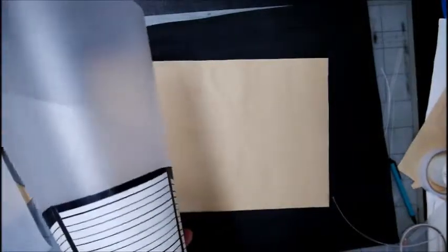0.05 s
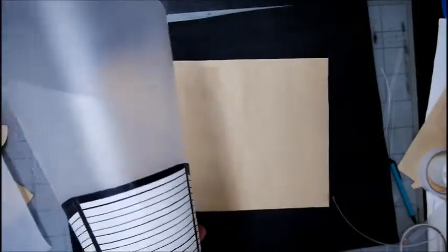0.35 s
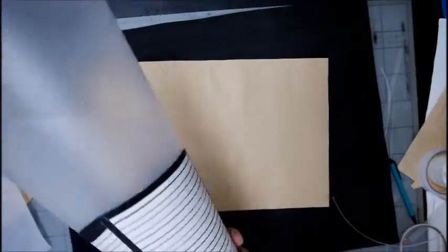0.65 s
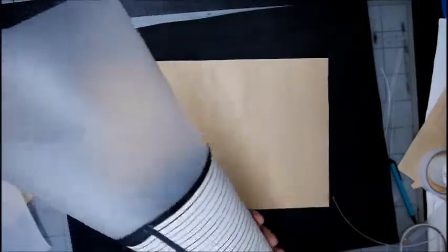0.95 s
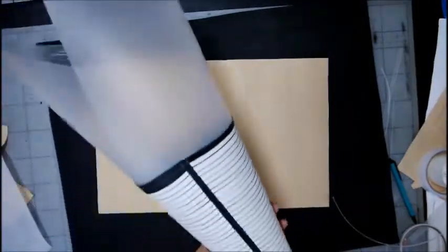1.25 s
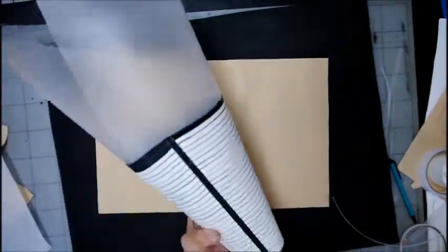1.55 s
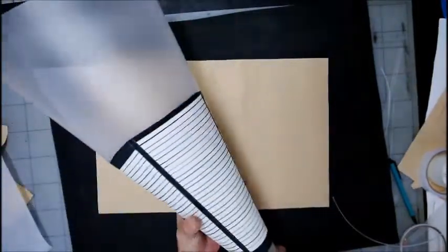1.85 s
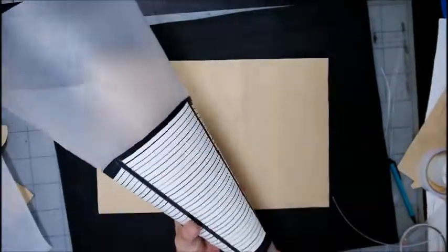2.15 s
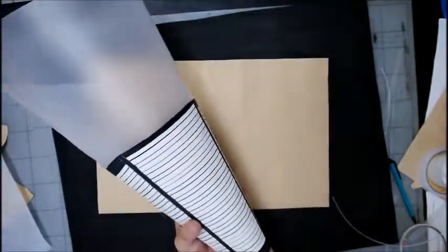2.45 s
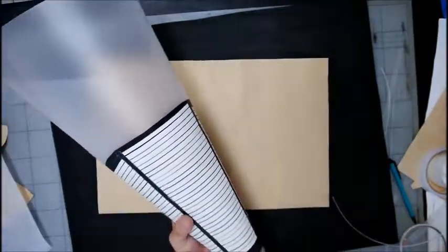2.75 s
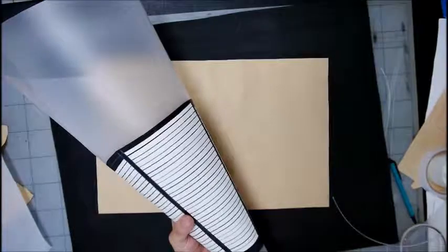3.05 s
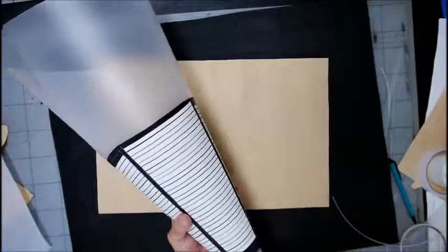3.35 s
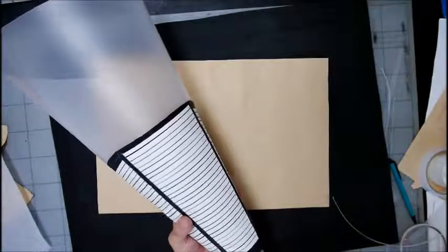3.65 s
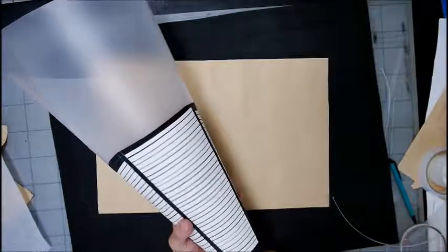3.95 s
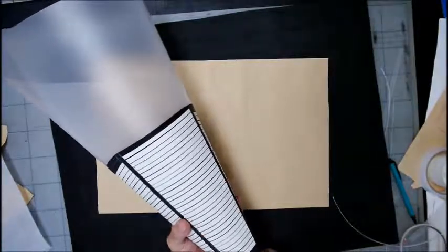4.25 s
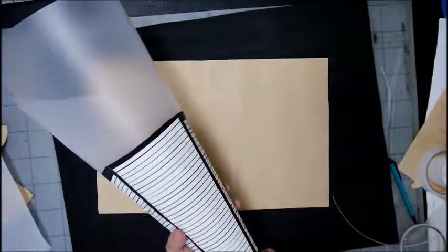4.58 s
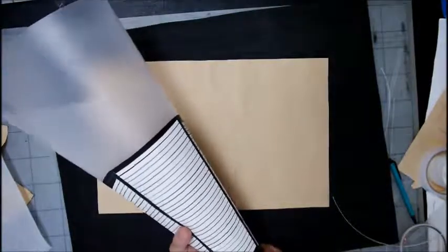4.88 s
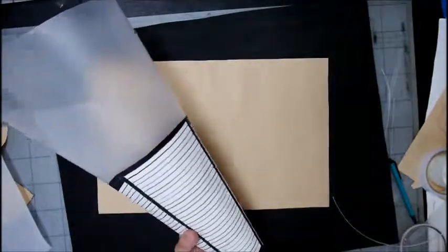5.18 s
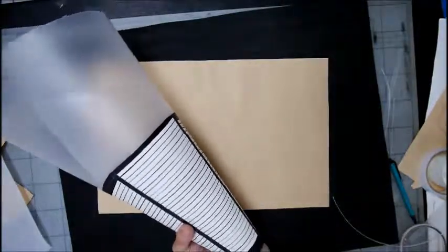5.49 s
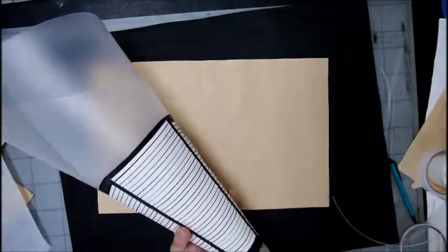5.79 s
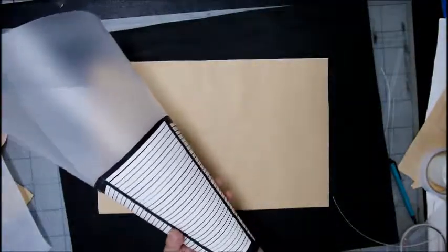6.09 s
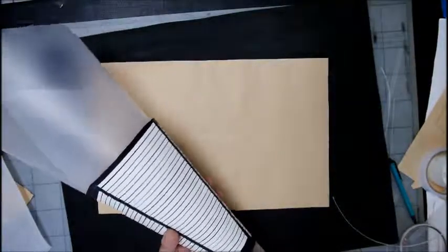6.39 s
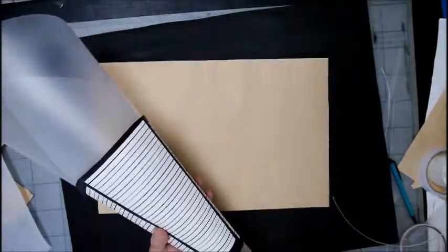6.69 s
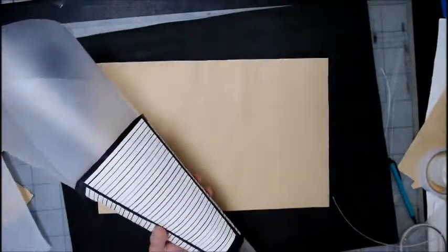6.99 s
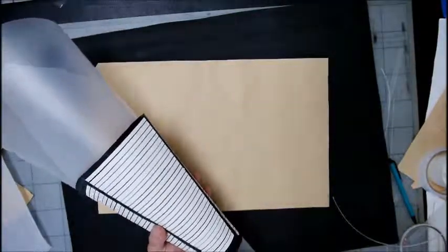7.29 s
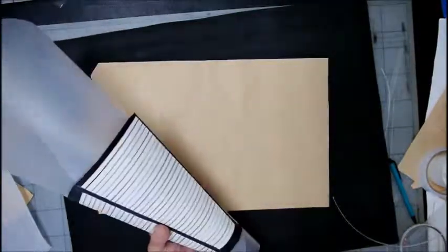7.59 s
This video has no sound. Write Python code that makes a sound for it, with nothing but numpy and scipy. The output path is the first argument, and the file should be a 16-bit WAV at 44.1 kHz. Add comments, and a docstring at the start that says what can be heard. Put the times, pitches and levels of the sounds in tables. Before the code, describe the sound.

A thin plastic sheet is rolled into a cone, sliding with a grainy hiss, rumbling hollowly and snapping over quiet ventilation.

```python
"""In a small room, over a work table, hands roll a thin plastic sheet into a cone.
Ventilation hums quietly throughout. With each push the layers slide over each other with a grainy
hiss, and the bending sheet gives a hollow rumble. Now and then it buckles with a snap, small creases
tick past its edge, or it catches and squeaks. The table and the walls echo these sounds."""
import sys
import numpy as np
from scipy import signal
from scipy.io import wavfile
from scipy.ndimage import uniform_filter1d

SR = 44100
rng = np.random.default_rng(int(sys.argv[2]) if len(sys.argv) > 2 else 0)


def generate_wav(sig):
    """Save sig (samples, or channels by samples) to the path in sys.argv[1] as 16-bit PCM at SR."""
    pcm = np.round(np.clip(np.atleast_2d(sig).T, -1, 1) * 32767).astype(np.int16)
    wavfile.write(sys.argv[1], SR, pcm)


N = 336483


def from_db(db):
    """Turn decibels into a factor to multiply by."""
    return 10 ** (np.asarray(db) / 20)


def unit_rms(x):
    """Scale a signal so that its average strength (rms) is 1."""
    return x / np.sqrt(np.mean(x ** 2) + 1e-20)


def white():
    """Plain noise, equally strong at every pitch."""
    return rng.standard_normal(N)


def at_hz(curve, hz):
    """Read a curve at one frequency, with octaves evenly spaced."""
    freqs, values = np.transpose(curve)
    return np.interp(np.log(hz), np.log(freqs), values)


def drift(rate_hz):
    """A smooth random wobble of typical size 1."""
    step, warm_up = 40, 2000
    r = np.exp(-2 * np.pi * step * rate_hz / SR)
    noise = rng.standard_normal(N // step + warm_up + 2)
    slow = signal.lfilter([1], [1, -2 * r, r * r], noise)[warm_up:]
    return np.interp(np.arange(N) / step, np.arange(len(slow)), unit_rms(slow))


def resonate(x, hz, width_hz):
    """Ring at one pitch; the smaller the width, the longer the ring."""
    r = np.exp(-np.pi * width_hz / SR)
    feedback = [1, -2 * r * np.cos(2 * np.pi * hz / SR), r * r]
    return signal.lfilter(np.array([1, 0, -1]) * (1 - r * r) / 2, feedback, x + 1e-18)


def ringing(force, modes, wander_db):
    """A force rings the sheet's natural tones (modes), each more or less as the contact moves."""
    return unit_rms(sum((-1) ** k * from_db(db + wander_db * drift(17)) * resonate(force, hz, width)
                        for k, (hz, width, db) in enumerate(modes)))


def fade(kicks, t60):
    """Let each kick die away; t60 is the time in seconds to fall by 60 dB."""
    return signal.lfilter([1], [1, -from_db(-60 / (t60 * SR))], kicks + 1e-18)


def slips(per_s, spread_db):
    """Tiny clicks of uneven size at random moments."""
    happens = rng.random(N) < per_s / SR
    sizes = from_db(spread_db * np.clip(white(), -2, 2))
    return unit_rms(happens * sizes * rng.choice([-1, 1], N))


# how alike left and right sound: f/Hz, likeness (1 = the same)
STEREO_LIKENESS = [(50, .95), (130, .98), (350, .995), (700, .94), (1200, .83), (1900, .47), (2700, 0),
                   (3800, .12), (5200, .38), (7200, .73)]
# how much louder left is than right: f/Hz, level/dB
STEREO_BALANCE = [(300, -.3), (800, -.8), (1200, -2.4), (1700, -2.2), (2300, -4.8), (3000, -2.2),
                  (4500, -1.4), (7000, -.5)]
def coloured(source, spectrum, flicker_db):
    """Shape noise or clicks into a stereo sound whose third-octave bands each flicker; rms 1."""
    edges = 22 * 2 ** (np.arange(27) / 3)
    pairs = [np.array([source(), source()]) for _ in range(2)]
    out, sides = np.zeros((2, N)), np.array([[1], [-1]])
    for k, (low, high) in enumerate(zip(edges, edges[1:])):
        if high < spectrum[0][0]:
            continue
        hz = np.sqrt(low * high)
        band = signal.butter(2, [low, high], "band", fs=SR, output="sos")
        mid, side = signal.sosfilt(band, pairs[k % 2] + 1e-18)
        alike = at_hz(STEREO_LIKENESS, hz)
        level_db = at_hz(spectrum, hz) + flicker_db * drift(21) + sides * at_hz(STEREO_BALANCE, hz) / 2
        out += from_db(level_db) * (np.sqrt(1 + alike) * mid + np.sqrt(1 - alike) * side * sides)
    return unit_rms(out)


# tones of the ventilation: f/Hz, level/dB
HUM_TONES = [(113, -64), (301, -64.5), (412, -67), (581, -69), (815, -70.5), (2708, -77)]
# tone colour of the moving air: f/Hz, relative level/dB
AIR_COLOUR = [(25, -11), (60, -1.5), (170, -0.5), (230, 2.5), (350, -2.5), (600, -4.5), (1120, -8.5),
              (1350, -18.5), (2000, -18.5), (4000, -18.5), (7400, -21)]
# tone colour of the faint hiss around it: f/Hz, relative level/dB
WIDE_COLOUR = [(40, -8.5), (150, -1.5), (600, 4.5), (1500, 1.5), (2800, 1.5), (5000, -2.5), (7500, -16)]
def ventilation():
    """Air rushes softly and steadily, with a few wavering tones and a faint, wide hiss."""
    hum = sum(from_db(db) * unit_rms(resonate(white(), hz, 3 + 0.018 * hz)) for hz, db in HUM_TONES)
    wide_hiss = unit_rms(coloured(white, WIDE_COLOUR, flicker_db=1)[0]) * [[1], [-1]]
    air = coloured(white, AIR_COLOUR, flicker_db=0.86)
    return from_db(-55.5) * air + hum + from_db(-59.5) * wide_hiss


# swells of rubbing and rumble, from pushes or from ringing on after a snap:
# t/s, length/s, rasp level/dB, hiss level/dB, rumble level/dB
SWELLS = [(0.793, 0.033, -50, -51.5, -52), (0.899, 0.081, -58.5, -58.5, -57),
          (1.104, 0.049, -63.5, -61, -53), (1.2, 0.052, -56.5, -55.5, -65),
          (1.33, 0.078, -59, -60.5, -55.5), (1.602, 0.21, -59, -53.5, -59),
          (1.905, 0.03, -62.0, -57.5, -63), (2.026, 0.057, -52.5, -54, -59.5),
          (2.174, 0.028, -56.0, -53.5, -54.5), (2.347, 0.16, -52, -57.5, -42),
          (2.536, 0.055, -47.5, -56, -43), (2.668, 0.051, -50, -59.5, -39), (2.824, 0.052, -57, -52.5, -73),
          (2.968, 0.11, -49.5, -56.0, -40), (3.147, 0.061, -53.5, -58, -46), (3.29, 0.031, -75, -60.5, -43),
          (3.34, 0.098, -46.5, -56.5, -40.5), (3.517, 0.033, -48.5, -56.5, -43.0),
          (3.603, 0.043, -44, -45.5, -46.5), (3.687, 0.148, -50, -53.5, -53),
          (3.862, 0.079, -50.5, -60.5, -47), (4.011, 0.083, -46, -51.5, -48),
          (4.183, 0.033, -56, -55, -50.0), (4.422, 0.032, -63, -82, -51), (4.54, 0.27, -48, -55.5, -43.5),
          (4.79, 0.11, -40.5, -49, -40.5), (4.896, 0.18, -49, -55.5, -44.5),
          (5.1, 0.079, -39.5, -50.5, -36.5), (5.239, 0.091, -35.0, -41.5, -35),
          (5.378, 0.12, -41.0, -43, -36.5), (5.558, 0.022, -38.5, -45, -33), (5.666, 0.16, -40, -51, -35),
          (5.861, 0.054, -45.5, -48.5, -43.5), (6.051, 0.091, -38, -44.5, -33),
          (6.207, 0.17, -40.5, -46.5, -32.5), (6.414, 0.15, -41.5, -50, -35),
          (6.628, 0.075, -54, -57.5, -70), (6.696, 0.17, -55.5, -57.5, -52.5),
          (6.938, 0.042, -72, -83, -43), (7.009, 0.17, -50, -65, -39.0), (7.075, 0.07, -62, -67, -40.5),
          (7.157, 0.19, -40, -47.5, -38), (7.386, 0.054, -47.5, -57, -39), (7.525, 0.14, -33, -39, -29)]
def swelling(layer, t60, rest_db, grip_s=0.8, rise_share=0.75):
    """The loudness of one layer of sound: each swell rises, holds, then dies away."""
    t = np.arange(N) / SR
    power = from_db(rest_db) ** 2 * (t > grip_s)  # once held, the sheet never quite rests
    column = ["rasp", "hiss", "rumble"].index(layer)
    for start, length, *levels_db in SWELLS:
        span = slice(int(start * SR), int(start * SR) + SR)
        age = t[span] - start
        rise = np.sin(np.pi / 2 * np.clip(age / (rise_share * length), 0, 1))
        fallen_db = 60 * np.maximum(age - length, 0) / t60
        power[span] += (rise * from_db(levels_db[column] - fallen_db)) ** 2
    return np.sqrt(power)


# tone colour of the broad faces rubbing: f/Hz, relative level/dB
RASP_COLOUR = [(300, -25.5), (500, -0.5), (800, -4.5), (1100, -5), (1500, -4), (2100, -8), (2800, -11),
               (4200, -13.5), (8000, -46.5)]
# higher tones of the sheet, rung by the rubbing: f/Hz, width/Hz, relative level/dB
RUB_TONES = [(840, 41, 3.5), (1083, 85, -1), (1342, 61, 0), (1388, 53, 1.5), (1525, 55, -2), (1805, 10, 1),
             (2298, 56, -7)]
# tone colour of the sliding edge: f/Hz, relative level/dB
HISS_COLOUR = [(900, -26), (2000, 1), (3000, 5.5), (4000, 4), (5200, 6.5), (6400, 8), (8000, -17.5)]
def sliding(rasp_gain, hiss_gain):
    """Thousands of tiny slips a second blur into rasp and hiss; the unsteady grip shakes both."""
    flutter = drift(39)
    rub = coloured(lambda: slips(per_s=2500, spread_db=3.5), RASP_COLOUR, flicker_db=2.5)
    ring = ringing(slips(per_s=2500, spread_db=1), RUB_TONES, wander_db=4)
    rasp = unit_rms(rub + from_db(-8.5) * ring)
    hiss = coloured(lambda: slips(per_s=9000, spread_db=1), HISS_COLOUR, flicker_db=1.75)
    return rasp * rasp_gain * from_db(flutter) + hiss * hiss_gain * from_db(1.28 * flutter)


# how the roll changes: t/s, relative flap level/dB, thump f/Hz
TIGHTNESS = [(0, -11, 310), (3.2, -10, 290), (3.5, -19, 368), (4.0, -21.5, 371), (5.7, -19, 344),
             (6.2, -13.5, 355.7)]
def tightening():
    """As the cone tightens, its loose flap is rolled in and the stiffer sheet thumps higher."""
    times, flap_db, thump_hz = np.transpose(TIGHTNESS)
    t = np.arange(N) / SR
    return np.interp(t, times, flap_db), np.interp(t, times, thump_hz)


# hollow tones of the cone: f/Hz, width/Hz, relative level/dB
CONE_TONES = [(312.8, 34.8, 3), (334.5, 20.1, 4.5), (358.6, 21, 1.5), (414, 153, -12), (560, 4.8, -16.5),
              (584.5, 42, -12), (656, 36, -14), (753, 15, -17.5)]
# tones of its loose flap: f/Hz, width/Hz, relative level/dB
FLAP_TONES = [(179.3, 23, -0.5), (232, 89, -4.5), (648, 110, -2), (1060, 270, -10)]
def flexing(rumble_gain):
    """Small jerks of the bending sheet keep the cone and its flap ringing: a hollow rumble."""
    flap_db, _ = tightening()
    jerks = slips(per_s=400, spread_db=1.5)
    bass_cut = signal.butter(3, 215, "high", fs=SR, output="sos")  # an open cone gives off little bass
    cone = signal.sosfilt(bass_cut, ringing(jerks, CONE_TONES, wander_db=1.5))
    rumble = cone + from_db(flap_db) * ringing(jerks, FLAP_TONES, wander_db=2.5)
    # even out the rumble, so that swells and shudders set its loudness
    rumble /= np.sqrt(uniform_filter1d(rumble ** 2, size=1900) + 1e-12)
    uneven_gain = rumble_gain * from_db(drift(13))
    return rumble * np.hypot(uneven_gain, shudder())


# the soft scrape as sliding begins (first row), then snaps of the sheet, before each part's own gain:
# t/s, thump level/dB, knock level/dB, crack level/dB
SCRAPE_AND_SNAPS = [(0.805, -54, -57, -50), (1.2287, -34, -38, -55), (1.346, -34.5, -36, -44),
                    (1.389, -35, -62, -73), (2.18, -47, -42, -52), (2.2826, -36.5, -35.5, -50),
                    (2.374, -27.5, -56, -53), (2.38, -32, -25, -42), (2.47, -26, -26.5, -44),
                    (2.6, -28.5, -34, -58), (3.187, -29, -35, -53), (3.383, -28.5, -56, -43),
                    (3.537, -25.5, -54, -61), (3.6118, -29.5, -28, -40.5), (4.425, -30, -57, -75),
                    (4.54, -21.5, -36, -55), (4.856, -28.5, -32, -49), (5.5279, -20.5, -32, -54),
                    (5.568, -20.5, -27, -42), (6.5566, -23, -31, -38.5), (6.679, -32.5, -41, -49),
                    (6.756, -44, -37.5, -49), (7.047, -32, -41, -51.5), (7.546, -29, -35, -57)]
def snapping(flap_hz=190, knock_hz=760):
    """A soft scrape, then snaps as the sheet buckles: each a crack, a knock and a few quick swings."""
    thump_t60, flap_t60, knock_t60, crack_t60 = 0.057, 0.027, 0.011, 0.019
    thump_gain_db, flap_gain_db, knock_gain_db, crack_gain_db = -0.5, 8, 3.5, 3
    t = np.arange(SR // 6) / SR

    def ping(hz, db, t60):
        return np.sin(2 * np.pi * hz * t) * from_db(db - 60 * t / t60)

    flap_db, thump_hz = tightening()
    body, crack_gain = np.zeros((2, N + len(t)))
    for start, thump_db, knock_db, crack_db in SCRAPE_AND_SNAPS:
        at = round(start * SR)
        thump = ping(thump_hz[at], thump_db + thump_gain_db, thump_t60)
        flap = ping(flap_hz, thump_db + flap_db[at] + flap_gain_db, flap_t60)
        knock = ping(knock_hz, knock_db + knock_gain_db, knock_t60)
        body[at:at + len(t)] += flap - thump + knock
        crack_gain[at:at + len(t)] += from_db(crack_db + crack_gain_db - 60 * t / crack_t60)
    # a thin sheet gives off little bass, and its soft motion little treble
    band = signal.butter(2, [150, 2600], "band", fs=SR, output="sos")
    return signal.sosfilt(band, body[:N] + 1e-18) + crack_gain[:N] * cracking()


def shudder(below_thump_db=9.5, rise_s=0.005):
    """The loudness of the rumble that spreads through the sheet after each scrape or snap."""
    kicks = np.zeros(N)
    for start, thump_db, _, _ in SCRAPE_AND_SNAPS:
        kicks[round(start * SR)] = from_db(thump_db - below_thump_db)
    lag = np.exp(-1 / (rise_s * SR))
    return signal.lfilter([1 - lag], [1, -lag], fade(kicks, t60=0.097))


# tone colour of a popping crease: f/Hz, relative level/dB
CRACK_COLOUR = [(900, -2), (1600, 3.5), (3000, 4.5), (8000, 0)]
def cracking():
    """The bright, flickering noise from which each crack and tick is cut."""
    return coloured(white, CRACK_COLOUR, flicker_db=2)


def crinkling(hiss_gain, per_s=14, level_db=-7):
    """Small creases flick past the sliding edge with faint, dry ticks."""
    flicks = (rng.random(N) < per_s / SR) * rng.uniform(0.25, 1, N)
    return fade(flicks, t60=0.011) * hiss_gain * from_db(level_db) * cracking()


# moments when the sheet catches: middle t/s, length/s, f/Hz, level/dB
CATCHES = [(1.74, 0.23, 1830, -59.5), (3.636, 0.043, 840, -40.5), (4.084, 0.06, 7080, -45.5),
           (6.69, 0.044, 3730, -64.5)]
def squeaking():
    """Where the sheet catches, the slips bunch into a brief, rough squeak."""
    t, out = np.arange(N) / SR, 0
    for middle, length, hz, db in CATCHES:
        width_hz = 250 + 0.11 * hz
        chatter = resonate(resonate(white(), hz, width_hz), hz, width_hz)
        swell = np.exp(-(2 * (t - middle) / length) ** 2)
        out += from_db(db) * swell * unit_rms(chatter)
    return out


# echoes off the table and near walls: delay t/s, level/dB
NEAR_ECHOES = [(0.0128, -14.5), (0.0274, -15), (.0385, -11)]
def room(sound, t60=0.24, tail_db=-8, bass_width=0.07):
    """A few clear echoes within a blurred, fading tail whose bass is nearly the same left and right."""
    t = np.arange(SR // 2) / SR
    tails = rng.standard_normal((2, len(t))) * from_db(-60 * t / t60) * (t > 0.008)
    bass = signal.butter(2, [120, 1800], "band", fs=SR, output="sos")
    treble = signal.butter(2, 1800, "high", fs=SR, output="sos")
    narrow_tails = tails[0] + bass_width * tails[1] * [[1], [-1]]
    response = signal.sosfilt(bass, narrow_tails) + signal.sosfilt(treble, tails)
    response *= from_db(tail_db) / np.sqrt(np.sum(response ** 2, axis=1, keepdims=True))
    smear = signal.windows.hann(round(0.0008 * SR))  # clutter on the surfaces dulls each echo
    for delay, db in NEAR_ECHOES:
        at = round(delay * SR)
        response[:, at:at + len(smear)] += from_db(db) * smear / smear.sum()
    return signal.fftconvolve(sound, response, axes=1)[:, :N]


def scene():
    """The sheet slides, bends and snaps; the room adds its echoes and its hum."""
    rasp_gain = swelling("rasp", t60=0.28, rest_db=-62)
    hiss_gain = swelling("hiss", t60=0.28, rest_db=-67)
    rumble_gain = swelling("rumble", t60=0.41, rest_db=-61)
    rubbing = sliding(rasp_gain, hiss_gain) + crinkling(hiss_gain)
    sheet = rubbing + flexing(rumble_gain) + snapping() + squeaking()
    return sheet + room(sheet) + ventilation()


def record(dry, cutoff_hz=7900):
    """Cut away the highest treble steeply."""
    return signal.sosfilt(signal.ellip(10, 0.3, 80, cutoff_hz, fs=SR, output="sos"), dry)


dry = scene()
out = record(dry)
generate_wav(out)
```